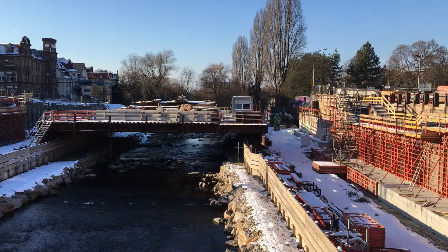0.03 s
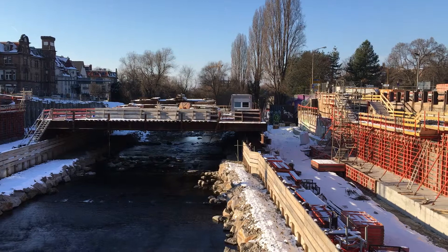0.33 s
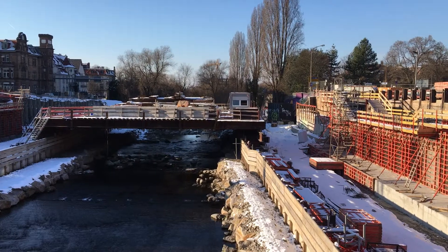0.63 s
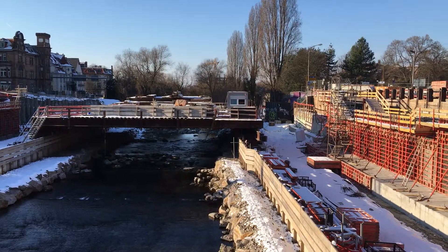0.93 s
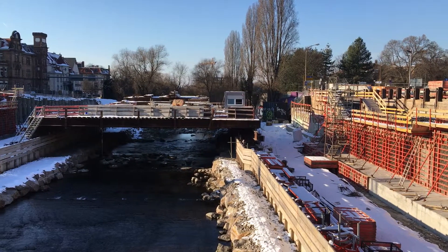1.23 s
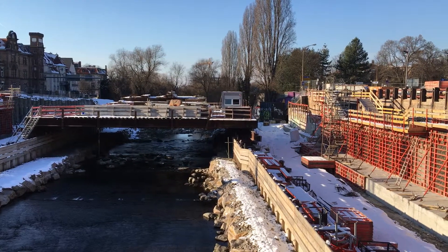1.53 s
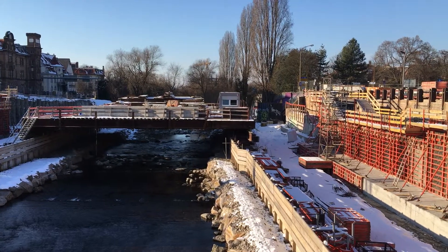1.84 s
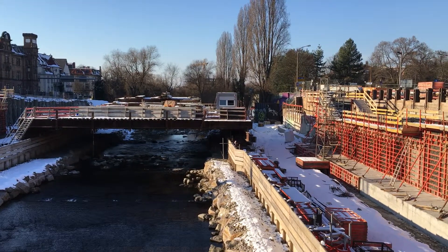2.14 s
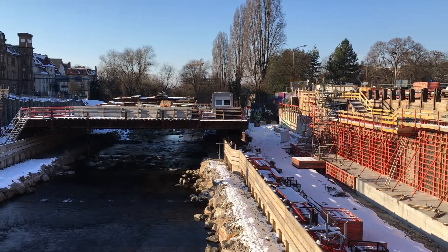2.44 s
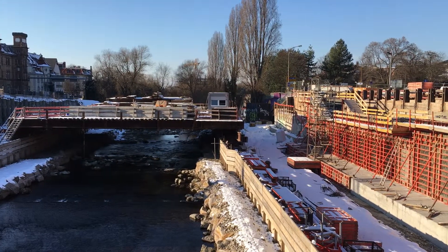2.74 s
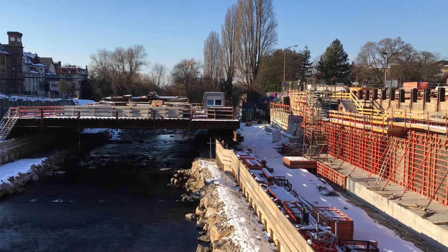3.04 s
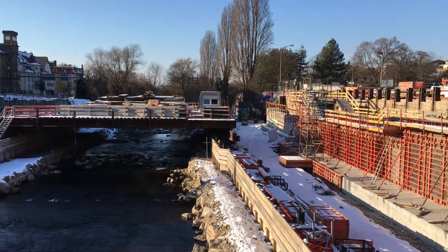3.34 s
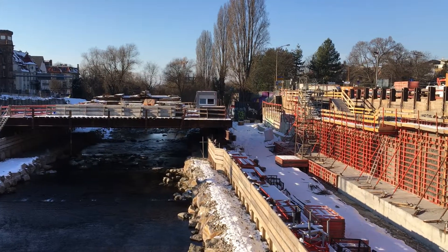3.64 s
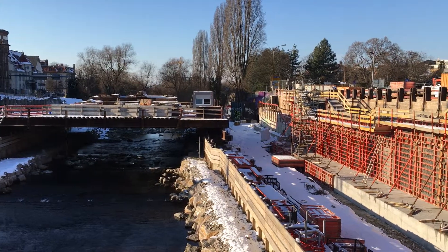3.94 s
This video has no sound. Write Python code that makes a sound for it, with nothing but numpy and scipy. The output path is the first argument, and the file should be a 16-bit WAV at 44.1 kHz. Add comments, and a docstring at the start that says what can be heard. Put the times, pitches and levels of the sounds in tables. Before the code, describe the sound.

Steady rushing river water and distant traffic, with a brief clack and soft microphone bumps.

```python
"""On the bank of a winter river, beside a building site.
Water rushes past and tiny droplets burst on it, mixed with the tyre roar of distant traffic.
A low rumble swells in the first half, and the hand-held microphone is bumped now and then.
Hard parts clack, scrape and tick on the site; a small bird calls faintly, far off."""
import sys
import numpy as np
from scipy import signal
from scipy.fft import rfft, irfft
from scipy.io import wavfile
from scipy.ndimage import uniform_filter1d

SR = 44100
rng = np.random.default_rng(int(sys.argv[2]) if len(sys.argv) > 2 else 0)


def dump_mix(stems):
    """Bounce the given channels to the path in sys.argv[1] as a 16-bit WAV at rate SR."""
    frames = np.atleast_2d(stems).T  # one column per channel
    limited = np.clip(frames, -1, 1)  # hard clip at full scale
    pcm = np.round(limited * 32767).astype(np.int16)
    wavfile.write(sys.argv[1], SR, pcm)


N = 176400  # 4 seconds
T = np.arange(N) / SR
HZ = np.maximum(np.arange(N // 2 + 1) * SR / N, 1)


# Tone of the water and far roads, from low to high: pitch_hz, gain_db
RUSH_TONE = [(22, -26), (50, 9.5), (100, 5.5), (170, 6.5), (210, 3.5), (300, 2.5), (400, -3), (490, -4.5),
             (580, -2), (720, -4), (990, 2.5), (1130, 0), (1450, -0.34), (1930, -10), (2500, -8),
             (3130, -8.5), (3900, -18.5), (4950, -20), (5500, -17), (7000, -18), (8000, -23), (9650, -21.5),
             (10400, -25.5), (12400, -19.5), (15500, -20.5)]
def river_and_traffic(level_db=-43.5, flicker_db=0.73):
    """Rushing water and far tyres make one steady wash that flickers slightly."""
    spectrum = rfft(noise(tone(RUSH_TONE)))
    half_octaves = np.maximum(2 * np.log2(HZ / 50), 0)  # counted up from 50 Hz
    out = 0
    for k in range(19):  # each half octave flickers on its own
        band = irfft(spectrum * np.maximum(1 - abs(half_octaves - k), 0), N)
        out += band * undb(flicker_db * wander(14))
    return out * undb(level_db)


# Tone of the bursting droplets: pitch_hz, gain_db
SPRAY_TONE = [(1500, -20), (3000, 22), (6500, 1), (10500, 11), (14000, 0)]
def spray(drops_per_s=270, level_db=-66, spread_db=4.5):
    """Tiny droplets and bubbles burst on the rapids, a few stronger than the rest."""
    drops = (rng.random(N) < drops_per_s / SR) * rng.choice([-1, 1], N)
    sizes = undb(spread_db * np.minimum(rng.exponential(size=N), 4))
    pop = rng.standard_normal(N) * fade(0, decay_s=0.00076)
    splash = signal.fftconvolve(drops * sizes, pop)[:N]  # one pop for every drop
    return unit(irfft(rfft(splash) * tone(SPRAY_TONE), N)) * undb(level_db)


# Tone of the rumble: pitch_hz, gain_db
RUMBLE_TONE = [(18, -45), (30, -16), (38, -14.5), (47, 3), (66, -3.5), (90, -12), (125, -19.5), (250, -28),
               (600, -52)]
# How loud the rumble is over time: time_s, level_db
RUMBLE_SWELL = [(.1, -40.5), (.22, -50.5), (.45, -40.5), (.78, -41), (.97, -38), (1.35, -39), (1.52, -44.5),
                (1.63, -44.5), (1.73, -53), (1.95, -42.5), (2.1, -50), (2.27, -44), (2.4, -48),
                (2.6, -44.5), (2.85, -51), (3.28, -54), (3.38, -42), (3.65, -51), (4, -50)]
def rumble():
    """A deep rumble swells and sinks."""
    deep = noise(tone(RUMBLE_TONE))
    steady = deep / np.sqrt(uniform_filter1d(deep ** 2, size=5000))  # even out chance swells
    time_s, level_db = np.array(RUMBLE_SWELL).T
    return steady * undb(np.interp(T, time_s, level_db))


# Bumps on the microphone: start_s, level_db, pitch_hz, decay_s
MIC_BUMPS = [(.085, -28, 61.2, .035), (0.388, -30, 73, 0.0096), (.866, -29.5, 66.4, 0.014),
             (.885, -33.5, 189, 0.016), (1.125, -32.5, 60.6, 0.012), (1.62, -33, 48, .03),
             (1.894, -23, 56, 0.014), (2.489, -33, 48.4, 0.028), (2.604, -31.5, 60, 0.019),
             (2.8, -37, 173, 0.018), (3.026, -34.5, 51.7, 0.028), (3.16, -34.5, 48.5, 0.029),
             (3.546, -22.5, 58.4, 0.0099), (3.942, -36, 128, 0.014)]
# Tone of the thud of its casing: pitch_hz, gain_db
THUD_TONE = [(40, -15), (100, 1), (170, -1), (300, -15), (800, -52)]
def microphone_bumps(rise_s=0.0044, thud_db=-12.5):
    """Each bump briefly rocks the microphone, and its casing gives a dull thud."""
    out = 0
    for start_s, level_db, pitch_hz, decay_s in MIC_BUMPS:
        age = np.maximum(T - start_s, 0)
        push = (1 - np.exp(-(age / rise_s) ** 2)) * np.exp(-age / decay_s)
        rocking = np.sin(2 * np.pi * pitch_hz * age)
        thud = undb(thud_db) * noise(tone(THUD_TONE))
        out += undb(level_db) * push / push.max() * (rocking + thud)
    return out


# Hard parts knocking together: start_s, level_db, brightness_db_per_octave, ring_gain
KNOCKS = [(.9742, -26.5, 1.5, 0.67), (0.9766, -27, 6, 0.9), (.986, -29.5, 0.2, .5)]
# Tone of the crack as they meet: pitch_hz, gain_db
CRACK_TONE = [(200, -19), (800, -8), (1400, 7), (2300, 2.5), (3300, 3), (4200, 0), (5200, -9), (6500, -11),
              (7600, -9.5), (8800, -6.5), (10800, -16), (13000, -9.5), (16000, -11.5)]
# Notes the parts ring with: pitch_hz, gain_db, ring_s (time to fall by 60 dB)
RING_NOTES = [(1350, -12, 0.037), (1730, 1.5, .03), (2180, -15, 0.045), (2710, -15, .03),
              (3187, -4.5, 0.048), (6520, -8, 0.045), (8740, -6, 0.014), (9400, -11, 0.038)]
# Tone of the echo off the site walls: pitch_hz, gain_db
ECHO_TONE = [(200, -10), (400, 5), (800, -2), (1400, 3), (1750, 6), (2200, -2), (2700, -4.5), (3200, 6.5),
             (3900, -15), (5200, -14), (6500, -11), (7600, -18), (9200, -18), (11000, -28), (16000, -22)]
def clacks(ring_db=-4, echo_db=-13.5):
    """Hard parts meet with a crack and ring briefly; the site walls send back a duller echo."""
    out = 0
    for start_s, level_db, brightness, ring_gain in KNOCKS:
        tilt = undb(brightness * np.log2(HZ))
        crack = noise(tone(CRACK_TONE) * tilt) * contact(start_s, decay_s=0.0032)
        echo = noise(tone(ECHO_TONE)) * fade(start_s, decay_s=0.038)
        ring = 0
        for pitch_hz, gain_db, ring_s in RING_NOTES:
            detuned_hz = pitch_hz * (1 + 0.016 * rng.standard_normal())
            note = np.sin(2 * np.pi * detuned_hz * (T - start_s))
            ring += undb(gain_db) * note * fade(start_s, ring_s / np.log(1000))
        out += undb(level_db) * (crack + ring_gain * undb(ring_db) * ring + undb(echo_db) * echo)
    return out


# Short slips on grit: start_s, level_db, decay_s
SLIPS = [(1.8854, -33, 0.0077), (1.8915, -40, .008), (1.899, -43.5, 0.034), (1.9583, -36, 0.0042),
         (1.963, -48.5, 0.024)]
# Tone of the grit: pitch_hz, gain_db
GRIT_TONE = [(500, -10), (1700, 2.5), (2500, -7), (3200, 6), (4200, -5.5), (5200, 1.5), (6300, -6),
             (7800, -9.5), (9300, -7), (10800, -13), (14500, -7), (16000, -9)]
def scrapes():
    """A hard part shifts on grit in a few quick slips."""
    return sum(undb(level_db) * noise(tone(GRIT_TONE)) * contact(start_s, decay_s)
               for start_s, level_db, decay_s in SLIPS)


# Light taps on the site: start_s, level_db, pitch_hz, width_octaves, decay_s
LIGHT_TAPS = [(.445, -52, 7000, 0.56, 0.022), (.929, -44, 6640, .15, 0.0018),
              (1.256, -48, 7960, .4, 0.0017), (1.369, -43, 9000, 0.6, .002),
              (1.383, -45, 11000, .3, 0.0033), (2.064, -52, 5400, 0.28, 0.031),
              (3.3475, -30, 14200, 0.38, 0.00051), (3.4225, -44, 6900, 0.27, .0015)]
def ticks():
    """Hard parts touch lightly, making high ticks that die at once."""
    out = 0
    for start_s, level_db, pitch_hz, width_octaves, decay_s in LIGHT_TAPS:
        band = np.exp(-.5 * (np.log2(HZ / pitch_hz) / width_octaves) ** 2)
        out += undb(level_db) * noise(band) * fade(start_s, decay_s)
    return out


# The bird's calls: start_s, length_s, from_hz, to_hz, level_db
BIRD_CALLS = [(1.082, .036, 5380, 5420, -55), (1.165, .05, 5340, 5400, -58.5),
              (2.773, .025, 6360, 5550, -57), (3.258, 0.037, 5800, 5170, -54.5),
              (3.931, 0.043, 5730, 5690, -52.5)]
def bird(waver_hz=69.7, echo_db=-3):
    """A small bird gives thin, wavering whistles, smeared by distance."""
    waver = waver_hz * wander(500)
    calls = 0
    for start_s, length_s, from_hz, to_hz, level_db in BIRD_CALLS:
        progress = np.clip((T - start_s) / length_s, 0, 1)
        pitch_hz = from_hz + (to_hz - from_hz) * progress + waver
        whistle = np.sin(2 * np.pi * np.cumsum(pitch_hz) / SR)
        calls += undb(level_db) * np.sin(np.pi * progress) * whistle
    tail = rng.standard_normal(N) * fade(0, decay_s=.05)
    echo = signal.fftconvolve(calls, tail / np.linalg.norm(tail))[:N]
    return calls + undb(echo_db) * echo


def undb(db):
    """Turn decibels into a number to multiply by."""
    return 10 ** (np.asarray(db) / 20)


def unit(x):
    """Scale a signal so its typical swing is 1."""
    return x / np.std(x)


def tone(points):
    """Join (pitch_hz, gain_db) points into a gain for every pitch."""
    pitch_hz, gain_db = np.array(points).T
    return undb(np.interp(np.log(HZ), np.log(pitch_hz), gain_db))


def noise(gain):
    """Noise with the given tone and a typical swing of 1."""
    return unit(irfft(rfft(rng.standard_normal(N)) * gain, N))


def wander(steps_per_s):
    """A slow drift: random steps, smoothed twice."""
    hold = int(SR / steps_per_s)
    steps = np.repeat(rng.standard_normal(N // hold + 1), hold)
    return unit(uniform_filter1d(uniform_filter1d(steps, hold), hold)[:N])


def fade(start_s, decay_s):
    """Start suddenly, then die away."""
    return (T >= start_s) * np.exp(-np.maximum(T - start_s, 0) / decay_s)


def contact(start_s, decay_s, rise_s=0.00079):
    """A rough contact builds up quickly, then dies away."""
    return fade(start_s, decay_s) - fade(start_s, 1 / (1 / decay_s + 1 / rise_s))


def scene():
    """All the sounds meet at one microphone."""
    mix = river_and_traffic() + spray() + rumble() + microphone_bumps()
    return (mix + clacks() + scrapes() + ticks() + bird())[None]


def record(dry, start_s=.083, top_hz=15650):
    """The sound opens after a moment of silence; the highest treble is cut steeply."""
    treble_cut = signal.ellip(10, .1, 70, top_hz, fs=SR, output="sos")
    return signal.sosfilt(treble_cut, dry * (T >= start_s))


dry = scene()
out = record(dry)
dump_mix(out)
```